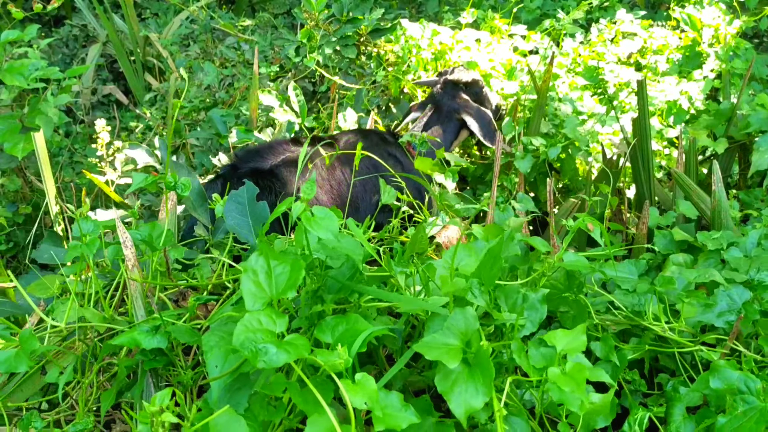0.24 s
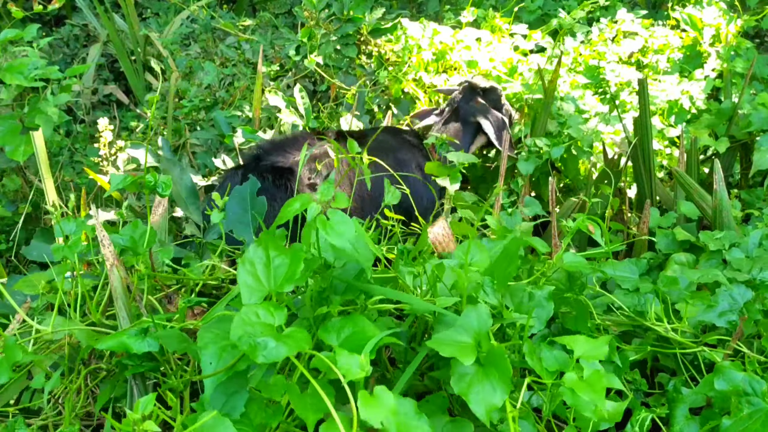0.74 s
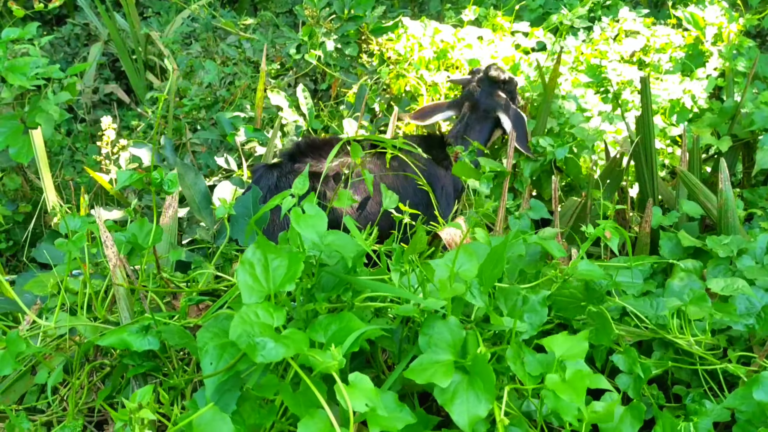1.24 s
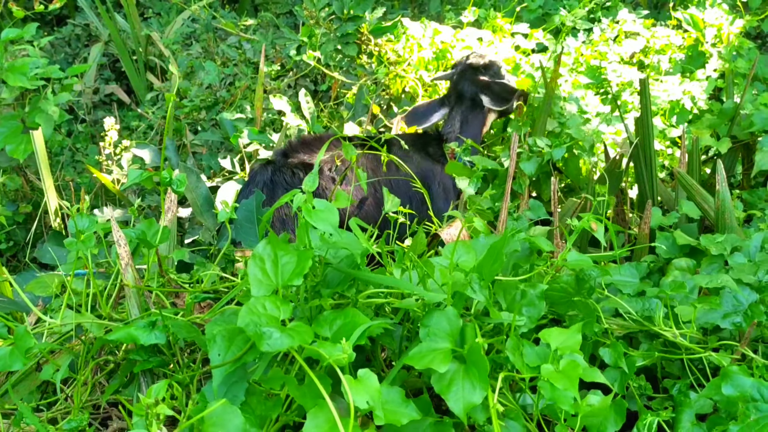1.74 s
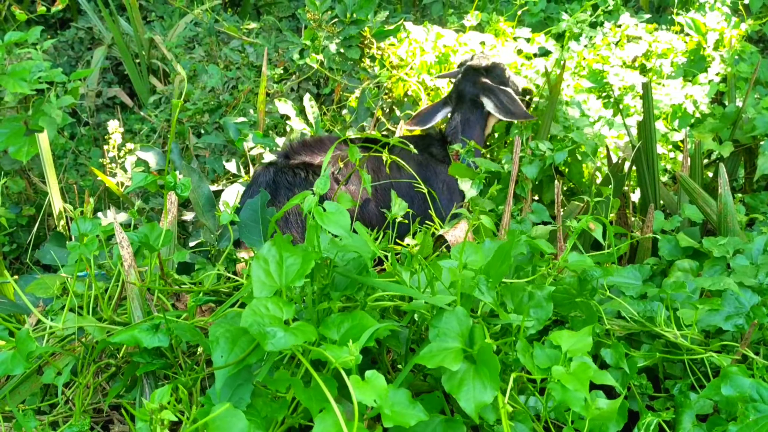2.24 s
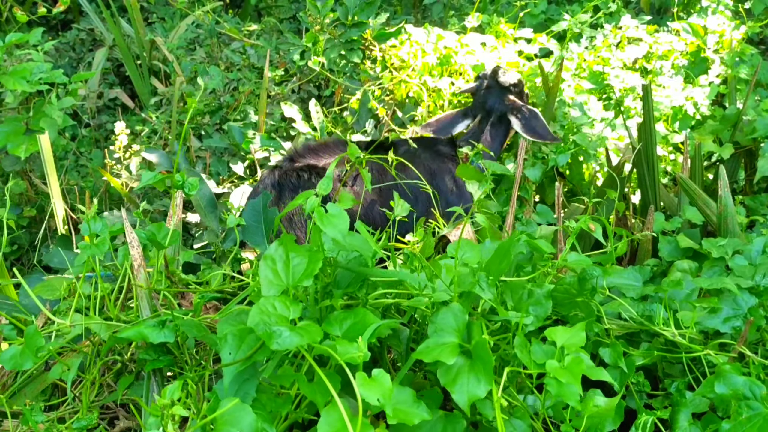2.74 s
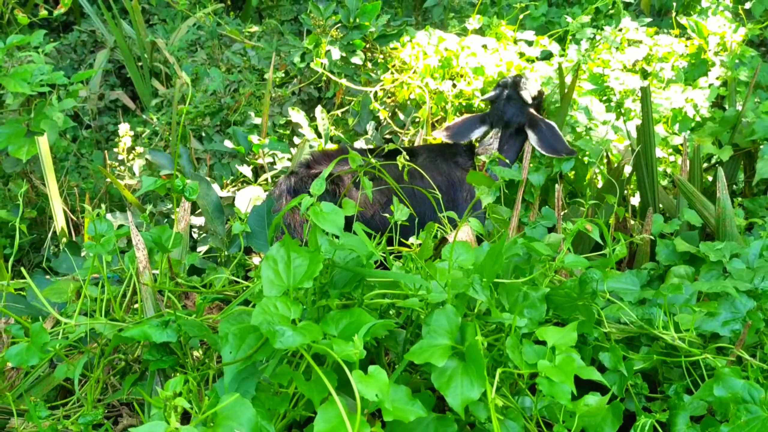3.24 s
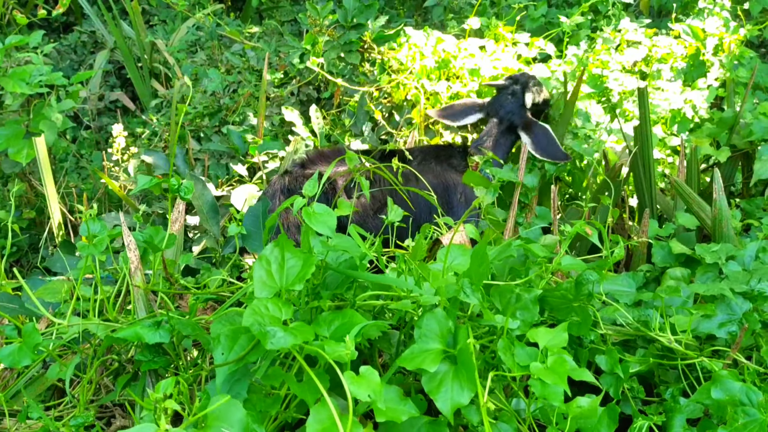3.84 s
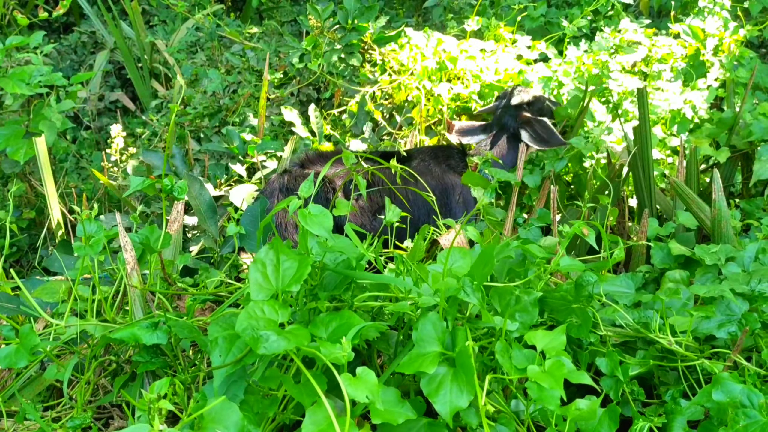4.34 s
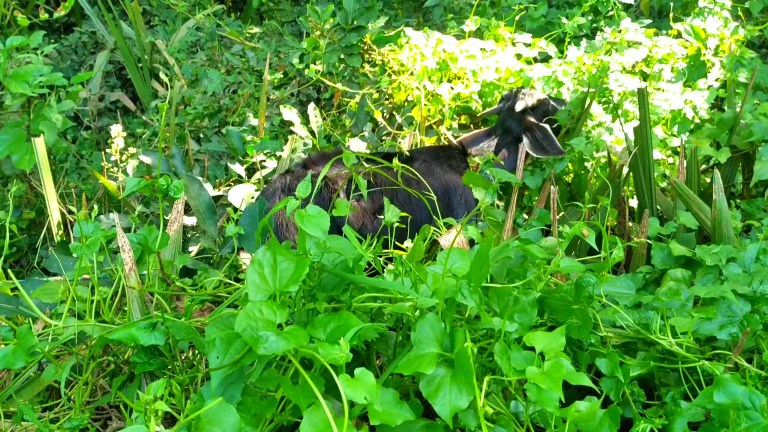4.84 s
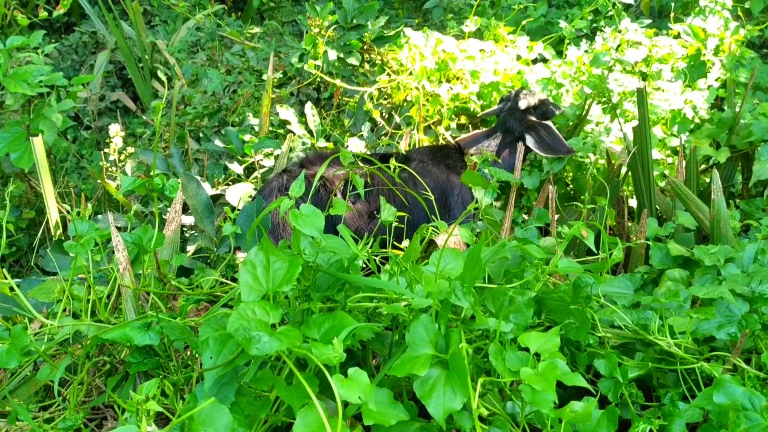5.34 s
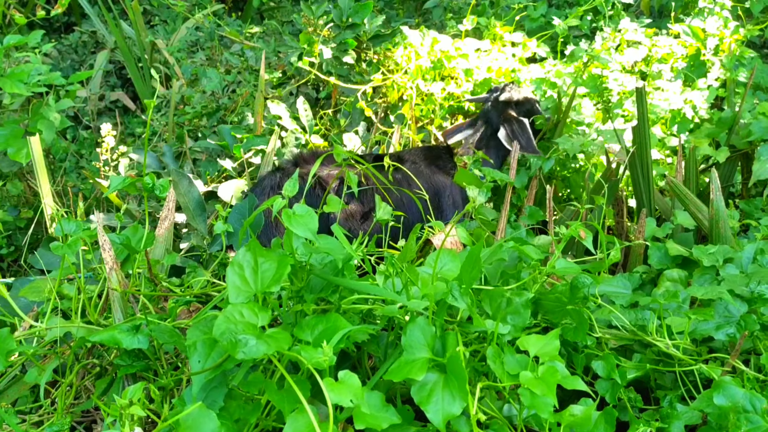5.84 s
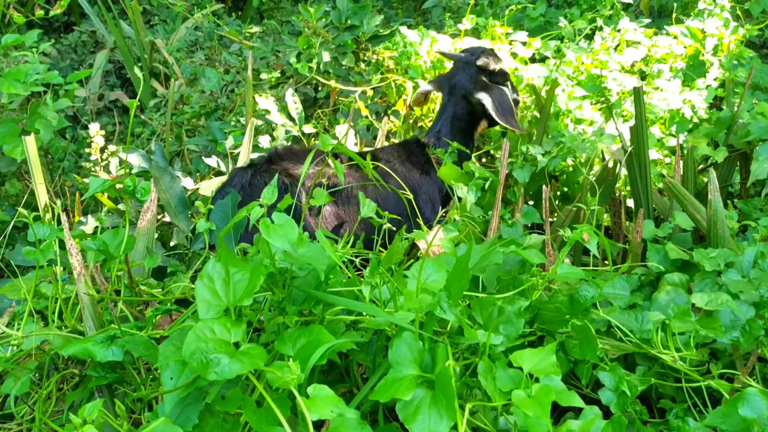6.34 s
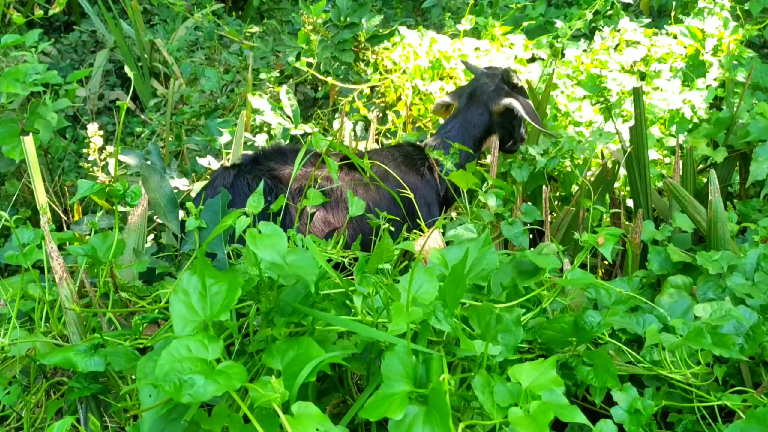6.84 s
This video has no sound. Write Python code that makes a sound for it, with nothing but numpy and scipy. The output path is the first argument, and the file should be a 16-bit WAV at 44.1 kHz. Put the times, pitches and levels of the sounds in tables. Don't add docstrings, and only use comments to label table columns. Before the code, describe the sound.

Outdoors in dense foliage, brisk leaf-on-leaf scraping and brittle crackling open the scene, strongest in the first second. Woody ticks and snaps continue more sparsely, with a few soft deep thuds midway. After a quiet stretch, a sharp double crack and another hard snap lead to softer rustling. Thin, high insect buzzing, a faint fluttering motor hum and low air rumble stay behind it, picked up by a small nearby microphone.

```python
import sys
import numpy as np
from scipy import signal
from scipy.fft import rfft, irfft
from scipy.io import wavfile
from scipy.ndimage import uniform_filter1d

SR = 44100
rng = np.random.default_rng(int(sys.argv[2]) if len(sys.argv) > 2 else 0)


def convert_level_to_amplitude(level_db):
    exponent = np.asarray(level_db, float) / 20
    return 10 ** exponent


def dump(signal):
    limited = np.clip(np.atleast_2d(signal).T, -1, 1)
    pcm = np.round(limited * 32767).astype(np.int16)
    wavfile.write(sys.argv[1], SR, pcm)


N = 312228
TIME_S = np.arange(N) / SR


def evened(x):
    return x / np.sqrt(np.mean(x ** 2) + 1e-20)


def curve(rows):
    return np.interp(TIME_S, [r[0] for r in rows], [r[1] for r in rows])


def colour(x, points):
    point_hz, point_db = np.transpose(points)
    hz = np.fft.rfftfreq(len(x), 1 / SR)
    gain_db = np.interp(np.log(hz + 1), np.log(point_hz + 1), point_db)
    return irfft(rfft(x) * convert_level_to_amplitude(gain_db), len(x))


def band(x, lo_hz, hi_hz):
    edges_hz = [lo_hz, min(hi_hz, .49 * SR)]
    return signal.sosfilt(signal.butter(2, edges_hz, "bandpass", fs=SR, output="sos"), x)


def ring(x, hz, width_hz):
    turn = np.exp(2j * np.pi * np.cumsum(hz * np.ones(len(x))) / SR)
    decay = np.exp(-np.pi * width_hz / SR)
    return 2 * (turn * signal.lfilter([1 - decay], [1, -decay], x / turn)).real


def drift(seconds):
    size = max(int(seconds * SR), 2)
    once = uniform_filter1d(rng.standard_normal(N), size)
    return evened(uniform_filter1d(once, size))


def add(mix, start_s, sound):
    part = mix[round(start_s * SR):][:len(sound)]
    part += sound[:len(part)]


def pushes():
    # start in seconds, hold in seconds, effort in dB, brightness in dB.
    push_rows = [(0, 0.035, -52.5, 0.5), (0.186, 0.19, -49.5, -1), (0.451, 0.0092, -47.5, 3),
                 (0.59, 0.052, -53, -3), (0.735, .14, -45, -1.5), (0.968, .14, -45.5, 0.5),
                 (1.134, 0.02, -60, 0), (1.36, .01, -60.5, 0), (1.528, 0.072, -61.5, 3),
                 (1.708, 0.012, -54, -1.5), (1.903, 0.05, -61.5, 1), (2.267, 0.2, -56.5, 0),
                 (2.54, 0.11, -50.5, -1.5), (2.834, 0.076, -52, -2), (3.02, .12, -57, 0),
                 (3.19, .01, -54, -0.5), (3.324, 0.0087, -53.5, -0.5), (3.455, 0.0084, -63, -3),
                 (3.693, .01, -60, -7), (3.945, .1, -62, -2), (4.253, .03, -61.5, -14),
                 (2.1, 0.055, -65.5, -2), (4.91, 0.0091, -64.5, 0), (5.08, .01, -60, -2),
                 (5.585, 0.36, -65, -2), (5.96, 0.18, -58, -2.5), (6.174, 0.27, -56.5, -3.5),
                 (6.515, 0.0086, -55, 1), (6.62, 0.25, -58.5, -2.5), (6.895, 0.017, -58, -2)]
    rise_db_per_s, fall_db_per_s = 123, 128
    still_db, still_bright_db = -67, -1
    power = convert_level_to_amplitude(2 * still_db) * np.ones(N)
    tilt = convert_level_to_amplitude(2 * still_db) * still_bright_db
    for start_s, hold_s, effort_db, bright_db in push_rows:
        rise_db = rise_db_per_s * np.maximum(start_s - TIME_S, 0)
        fall_db = fall_db_per_s * np.maximum(TIME_S - start_s - hold_s, 0)
        one = convert_level_to_amplitude(2 * (effort_db - rise_db - fall_db))
        power = power + one
        tilt = tilt + one * bright_db
    return 10 * np.log10(power), tilt / power


def scrapes(per_s, spread_db, t60_s):
    hits = rng.random(N) < per_s / SR
    size = convert_level_to_amplitude(spread_db * np.minimum(rng.exponential(1, N), 4)) * hits
    power = signal.lfilter([1], [1, -convert_level_to_amplitude(-120 / (t60_s * SR))], size ** 2)
    return evened(np.sqrt(power) * rng.standard_normal(N))


def leaves():
    # frequency in Hz, level in dB per Hz.
    comb_colour = [(150, -38), (250, -8), (386, -15), (640, -5), (906, -10), (1160, -5), (1550, -11),
                   (2360, -1), (3280, -7), (4050, -4), (5730, -7), (7570, -6), (8850, -3), (14900, -9),
                   (16000, -16)]
    broad = scrapes(per_s=1500, spread_db=3.0, t60_s=0.051)
    small = np.zeros(N)
    for hz in np.geomspace(700, 13000, num=7):
        grains = scrapes(per_s=170, spread_db=3.5, t60_s=.018)
        small += np.sqrt(hz) * evened(band(grains, hz / 1.25, hz * 1.25))
    both = colour(broad + 0.53 * evened(small), comb_colour)

    dull = evened(colour(both, [(150, -40), (240, 0), (1550, 0), (1950, -30)]))
    middle = evened(colour(both, [(1400, -30), (1750, 0), (7600, 0), (8600, -30)]))
    bright = evened(colour(both, [(7200, -30), (8100, 0), (20000, 0)]))
    effort_db, tilt_db = pushes()
    dull_db = -66 + 0.89 * (effort_db + 55) - 0.19 * tilt_db
    return dull * convert_level_to_amplitude(dull_db) + middle * convert_level_to_amplitude(effort_db - 3.5) + bright * convert_level_to_amplitude(effort_db + tilt_db - 2.5)


def insect(per_s, jitter, hz, width_hz, rough):
    rate_hz = per_s * (1 + jitter * drift(.01))
    clicks = np.diff(np.floor(np.cumsum(rate_hz) / SR), prepend=0)
    clicks = clicks * convert_level_to_amplitude(1.9 * rng.standard_normal(N))
    drive = (1 - rough) * evened(clicks) + rough * rng.standard_normal(N)
    wandering = ring(drive, hz * (1 + .004 * drift(.05)), width_hz)
    return evened(ring(wandering, hz, 1.4 * width_hz))


def insects():
    # time in seconds, level in dB.
    steady_level = [(0, -69), (1.5, -63.5), (2.29, -62.5), (2.33, -69), (4.5, -67), (6.25, -68),
                    (6.38, -64.5), (7.08, -64.5)]
    throbbing_level = [(2.26, -82), (2.33, -64), (3, -66), (4, -63.5), (5, -63), (5.8, -61.5), (6.28, -63),
                       (6.36, -92)]
    throb_start_s, throbs_per_s, slowing_per_s2 = 2.33, 7.37, .052
    since_s = TIME_S - throb_start_s
    phase = (throbs_per_s - slowing_per_s2 * since_s) * since_s % 1
    throb = uniform_filter1d(np.clip(phase / 0.37, 0, 1) * (phase < .9), size=300)
    steady = insect(82, .008, hz=8450, width_hz=380, rough=.56)
    throbbing = (0.5 + throb) * insect(117, .02, hz=8660, width_hz=350, rough=0.7)
    return convert_level_to_amplitude(curve(steady_level)) * steady + convert_level_to_amplitude(curve(throbbing_level)) * throbbing


def motor():
    # time in seconds, level in dB.
    hum_level = [(0, -57), (.83, -54), (.97, -62.5), (1.4, -64.5), (1.5, -59), (2.42, -54.5), (2.52, -68.5),
                 (2.92, -65), (4.38, -58.5), (4.51, -51.5), (4.84, -56.5), (4.9, -73), (5.0, -55),
                 (5.64, -68.5), (6.11, -53.5), (6.23, -70), (6.45, -72), (6.74, -56)]
    shaft_hz = 93.3 * (1 + 0.0284 * drift(0.039))
    turn = 2 * np.pi * np.cumsum(shaft_hz) / SR
    octave_db = -68.5 - 1.5 * TIME_S + 2.6 * drift(0.027) + 1.9 * drift(0.27)
    tone = convert_level_to_amplitude(curve(hum_level)) * np.sin(turn) + convert_level_to_amplitude(octave_db) * np.sin(2 * turn)
    neighbour = evened(ring(rng.standard_normal(N), 163.0, 5.3))
    return np.sqrt(2) * tone + convert_level_to_amplitude(-77.5) * neighbour


def air():
    # frequency in Hz, level in dB per Hz.
    wash_colour = [(3.5, -35), (6.0, -12.5), (87, -3), (113, -3.5), (143, -9.5), (484, -23.5), (673, -24.5),
                   (1440, -27.5), (2520, -23.5), (3510, -32), (7490, -25.5), (8550, -19.5), (9440, -23),
                   (14500, -38.5), (16000, -38)]
    # time in seconds, level in dB.
    rumble_level = [(0.0, -57.5), (2.13, -56.5), (3.19, -57.5), (3.75, -55), (3.84, -59.5), (4.12, -52),
                    (4.26, -60), (4.43, -53), (4.65, -58), (4.81, -52.5), (5.05, -56), (5.99, -56.5),
                    (7.08, -56.5)]
    wash_db = -54.5 - 4.5 + 2.0 * drift(0.072)
    wash = convert_level_to_amplitude(wash_db) * evened(colour(rng.standard_normal(N), wash_colour))
    rumble_db = curve(rumble_level) - 1 + 0.5 * drift(0.066)
    rumble = convert_level_to_amplitude(rumble_db) * evened(band(rng.standard_normal(N), 14.3, 71.0))
    return wash + rumble


def crack(peak_db, hz, body_db, air_db, shape):
    fibres = shape * rng.choice([-1., 1.], len(shape)) * rng.uniform(0.16, 1.9, len(shape))
    body = .3 * band(fibres, 800, 3600) + ring(fibres, 2500, 600)
    own = evened(ring(ring(fibres, hz, 0.2 * hz), hz, 0.2 * hz))
    own += 0.76 * min(1, (10000 / hz) ** 4) * evened(band(fibres, 3080, 7400))
    edge = .5 * evened(band(fibres, 11500, 17000)) - evened(band(fibres, 8000, 11500))
    sound = convert_level_to_amplitude(body_db + 10.5) * evened(body) + own + convert_level_to_amplitude(air_db + 11) * edge
    return convert_level_to_amplitude(peak_db) * sound / abs(sound).max()


def stems():
    # start in seconds, peak in dB, ring in Hz, body under 3.5 kHz in dB, air over 8
    # kHz in dB.
    breaks = [(0.239, -31, 2230, -22, -11), (0.3662, -34, 4600, -9, -10), (.6, -26, 2630, -11.5, -7.5),
              (.962, -30, 9250, -16, -9), (.6947, -37, 2520, -23, -3), (.7298, -36, 4330, -8, -13),
              (.8598, -33, 4080, -5, -7), (1.051, -31, 4510, -6, -17), (1.0844, -27, 2310, -8, -12),
              (1.704, -34.5, 4350, 0, -5), (1.9111, -38, 2290, -11, -1), (2.644, -34.5, 6650, -7, -9),
              (2.796, -37.5, 4400, 7, 4), (3.1207, -29.5, 2700, -12, -11), (3.1768, -30, 7000, -24, -18),
              (3.2784, -29.5, 7900, -18, -17), (3.327, -28.5, 4530, -4.5, -8),
              (3.859, -34.5, 2496, -4, -3.5), (5.1525, -25, 3500, -4, -7.5),
              (6.0533, -24.5, 6430, -18, -9.5), (3.1937, -39.5, 2410, 2, -13), (6.2515, -41, 2350, -18, -4),
              (6.398, -47, 2580, 8, -11), (6.8928, -32, 5040, -14, -21)]
    # start in seconds, peak in dB, ring in Hz.
    ticks = [(.0374, -43, 2680), (.191, -44, 2350), (.216, -36.5, 2350), (.2754, -41.5, 2520),
             (.3431, -41, 2400), (.3867, -41, 2500), (.552, -40.5, 2600), (.7934, -37, 2480),
             (1.5863, -45.5, 1960), (1.6726, -45, 2370), (1.7985, -45.5, 2350), (1.8771, -49, 2570),
             (2.245, -45, 2730), (2.2987, -43, 2450), (2.4744, -45, 2040), (2.5524, -42, 2320),
             (2.6258, -38, 2520), (2.6753, -39.5, 2630), (3.034, -43.5, 2448), (3.0494, -37.5, 1940),
             (2.836, -47, 2410), (3.22, -48, 2370), (3.268, -46, 2360), (3.6157, -48, 2430),
             (3.6667, -37.5, 2300), (4.2574, -51, 2138), (5.4246, -49.5, 2700), (6.1994, -43, 2260),
             (6.6949, -44.5, 2660), (7.0294, -48, 2690)]
    clicks = [(.0213, -42, 6700), (.285, -39, 4500), (.619, -32.5, 4600), (1.2456, -37, 6240),
              (1.514, -37.5, 6560), (1.95, -46, 4500), (2.118, -51, 4000), (2.16, -47, 3000),
              (2.2692, -43, 4040), (2.881, -47, 6810), (3.3149, -38, 3870), (3.97, -37.5, 7600),
              (4.0414, -50, 6620), (5.0694, -45, 4410), (5.3273, -45, 7110), (5.5754, -49, 5390),
              (5.589, -42.5, 6620), (5.7207, -46, 6710), (6.8084, -45, 4450), (6.8803, -41, 6540)]
    crackles = [(.1161, -33.5, 10600), (.1251, -29, 8700), (.2474, -36, 10200), (.4304, -32, 9260),
                (.4489, -25, 9370), (.4554, -32, 9480), (.4804, -37, 10200), (.5274, -45, 10300),
                (.7704, -36, 9870), (.8104, -31, 10800), (.8214, -33, 11000), (.8894, -40, 9170),
                (1.0234, -42, 9700), (1.1604, -39.5, 13530), (1.2251, -39, 9090), (3.4516, -33, 13600),
                (4.4054, -39.5, 11000), (4.49, -43, 11100), (4.9606, -43.5, 10450), (6.5064, -43, 9480),
                (6.7231, -40, 9040), (6.9184, -45, 9260)]
    # start in seconds, peak in dB, ring in Hz, body in dB, length in seconds.
    tears = [
        (5.1328, -32, 11100, -11, 0.01),
        (5.1365, -33, 2600, -8, .005),
        (1, -45, 2400, -12, 0.0097),
        (6.178, -40, 4300, -11, .008),
        (3.463, -45, 9500, -15, 0.0085),
        (7.028, -49, 3300, -12, 0.0088),
    ]
    snaps = [(*row, .027) for row in breaks]
    # body dB, air dB, t60 s
    snaps += [(*row, -8, -15, .03) for row in ticks]
    snaps += [(*row, -19, -18, .018) for row in clicks]
    snaps += [(*row, -20, -14, .022) for row in crackles]

    out, t = np.zeros(N), np.arange(2200) / SR
    onset = 1 - np.exp(-t / .0002)
    scatter = convert_level_to_amplitude(-19 - 60 * t / .12)
    hard_break = 1.1 * np.exp(-t / .0007)
    for start_s, peak_db, hz, body_db, air_db, t60_s in snaps:
        decay = convert_level_to_amplitude(-60 * (t / t60_s) ** 1.2)
        shape = onset * (hard_break + decay + scatter)
        add(out, start_s - .0003, crack(peak_db - 2.5, hz, body_db, air_db, shape))
    for start_s, peak_db, hz, body_db, length_s in tears:
        shape = onset * (np.exp(-(t / length_s) ** 6) + scatter)
        add(out, start_s, crack(peak_db, hz, body_db, -14, shape))
    return out


def thuds():
    # start in seconds, peak in dB, frequency in Hz, t60 in seconds.
    thud_rows = [
        (1.072, -50, 240, 0.11),
        (1.42, -41, 34.57, 0.15),
        (3.525, -33, 60, 0.071),
        (3.697, -29.5, 36, 0.14),
        (6.487, -29, 380, 0.007),
        (6.396, -45.5, 700, 0.026),
        (1.083, -42, 670, 0.027),
        (0.91, -49, 780, 0.038),
        (4.25, -54, 1200, .04),
    ]
    out, t = np.zeros(N), np.arange(8000) / SR
    for start_s, peak_db, hz, t60_s in thud_rows:
        soft_start = 1 - np.exp(-t * hz * 1.37)
        add(out, start_s, convert_level_to_amplitude(peak_db + 1 - 60 * t / t60_s) * soft_start * np.sin(2 * np.pi * hz * t))
    return out


def scene():
    return (leaves() + insects() + motor() + air() + stems() + thuds())[None]


def roll_off(x):
    return signal.sosfilt(signal.butter(12, 16640, fs=SR, output="sos"), x)


def record(dry):
    edge = [(10, 0), (15480, 0), (15620, -46), (16600, -46), (16700, -90)]  # (Hz, dB)
    mix = colour(dry[0], edge)[None]
    return roll_off(mix)


dry = scene()
out = record(dry)
dump(out)
```